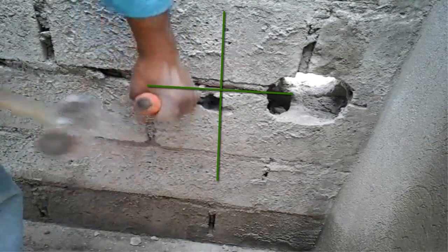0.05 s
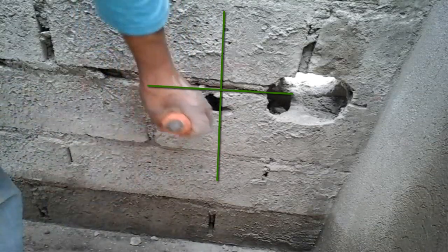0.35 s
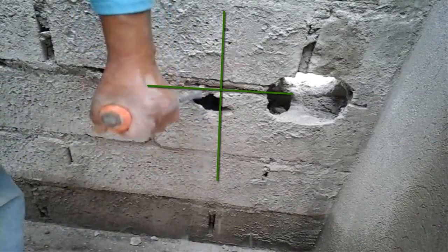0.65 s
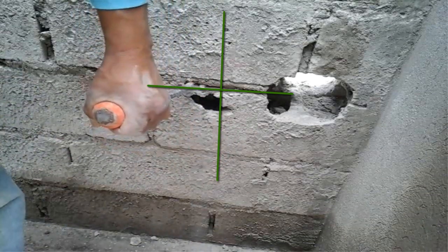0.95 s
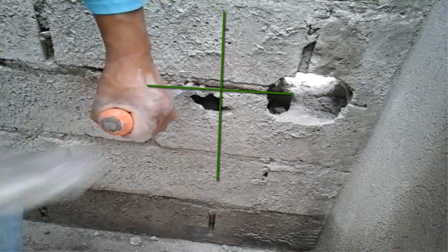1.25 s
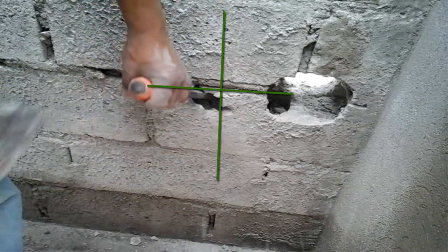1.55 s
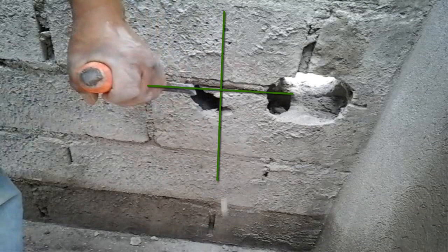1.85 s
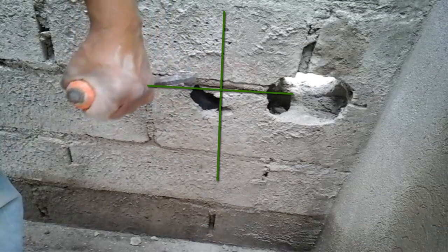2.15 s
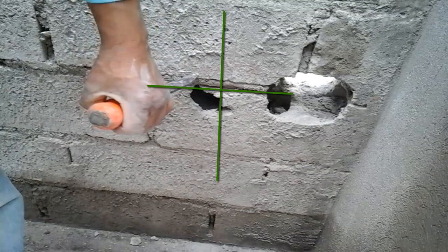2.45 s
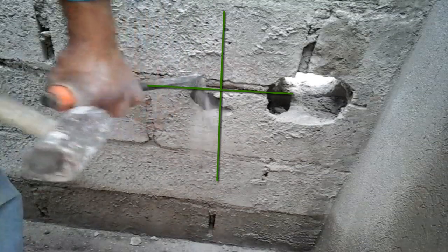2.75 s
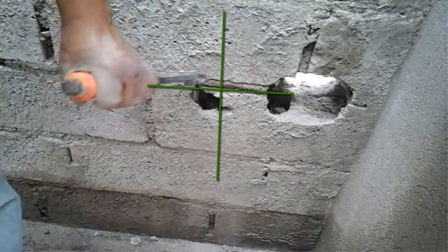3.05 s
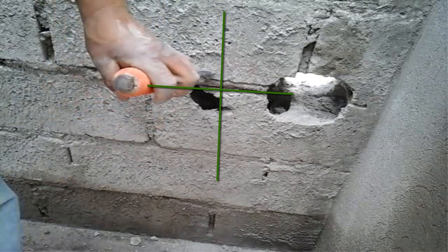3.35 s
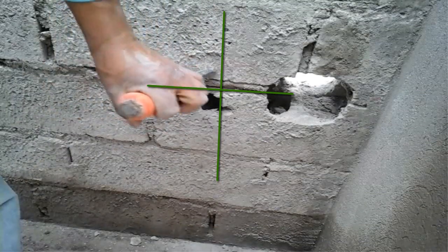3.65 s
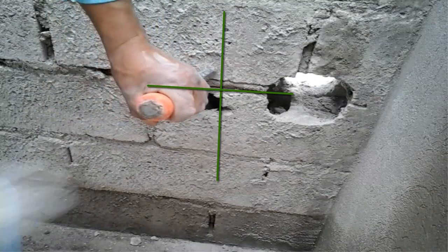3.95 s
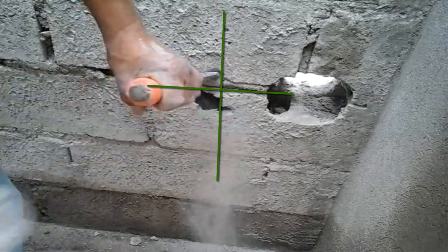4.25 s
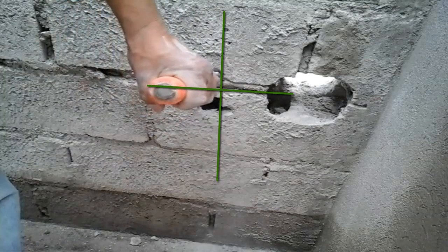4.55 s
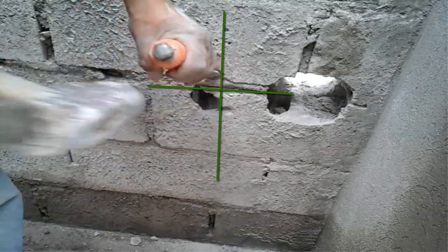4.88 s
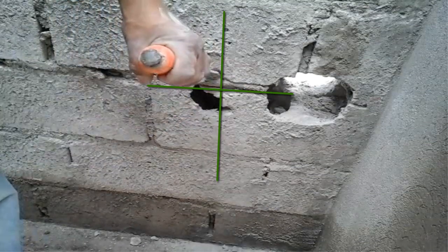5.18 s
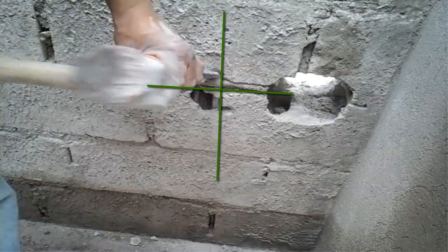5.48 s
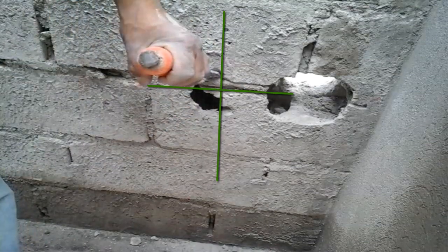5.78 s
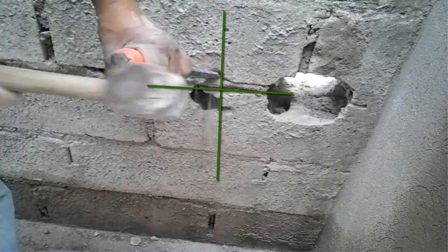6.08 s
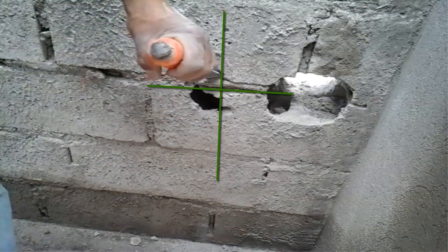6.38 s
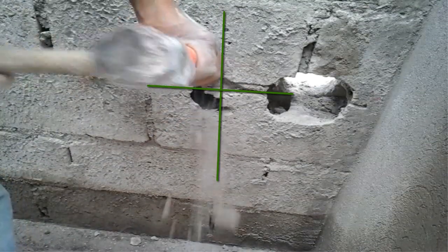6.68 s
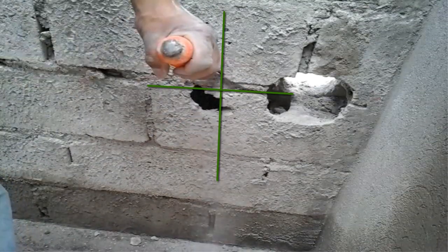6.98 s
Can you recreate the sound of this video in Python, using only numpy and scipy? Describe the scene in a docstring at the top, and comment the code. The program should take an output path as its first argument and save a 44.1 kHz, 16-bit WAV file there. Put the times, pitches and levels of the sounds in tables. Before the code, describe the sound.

A hammer drives a steel chisel into a hollow concrete block wall, close by and outdoors. The first blow, at 0.2 seconds, is a sharp, crumbling crack, followed at once by clacking chips and a lump knocking inside the wall, with more pieces around 0.7 seconds. A second crack at 1.6 seconds loosens more ticking chips, and a very faint whistle slides down just after 2 seconds. Firmer blows land at 3 and 4.4 seconds; another chip snaps off, and the loose chisel clinks at 4.6 seconds. Then comes a quicker, steady run at about 5, 5.7, 6.3 and 6.8 seconds, each hit meeting solid block with a crack, a low boom and a short ring. Faint sand and crumbs fall after the blows. The hits distort slightly and echo briefly off nearby hard surfaces, over a quiet distant rumble.

```python
"""A club hammer drives a steel chisel into a hollow concrete block wall, outdoors, at arm's length from
a stereo pair of microphones. The first blows break off chips and lumps that tick and fall; the later ones
meet solid block and make the wall boom. Sand trickles, the loose chisel clinks, a faint whistle slides
down once. Hard surfaces close by ring briefly over a distant rumble, and the blows overload the input."""
import sys
import numpy as np
from scipy import signal
from scipy.fft import rfft, irfft, next_fast_len
from scipy.io import wavfile
from scipy.ndimage import uniform_filter1d

SR = 44100
rng = np.random.default_rng(int(sys.argv[2]) if len(sys.argv) > 2 else 0)


def output_pcm(signal):
    """Save a mono or channel-first signal as 16-bit PCM at the path in sys.argv[1].

    Samples are clipped to [-1, 1] before scaling.
    """
    pcm = np.clip(np.atleast_2d(signal).T, -1, 1) * 32767
    wavfile.write(sys.argv[1], SR, np.round(pcm).astype(np.int16))


N = 309582
RING = 36000  # samples given to one event and its decay
AGE = np.arange(RING) / SR  # seconds since the event began

# hammer blows [t/s, level/dB, firmness from 0 (crumbling) to 1 (solid), hollow core level/dB]
BLOWS = [(.236, -3.5, .02, -32.5), (1.618, -1, 0, -33), (2.963, 2, 0.46, -11.5), (4.357, -1.5, 0.79, -8.5),
         (5.032, 2.5, 1, -22), (5.654, 3, 0.9, -14.5), (6.251, 2, 0.96, -14), (6.843, -1, 0.98, -11)]
# lumps landing inside the block [t/s, clack level/dB, knock level/dB]
LUMPS = [(.297, -10, -10), (0.658, -23.5, -32), (.739, -22.5, -33), (1.008, -35, -29), (2.354, -34, -26.5),
         (3.579, -43, -40)]
# low modes of the wall and the space before it [f/Hz, level/dB, t60/s]
WALL_MODES = [(106.7, -12.5, 0.84), (124, -13.5, 0.95), (131.7, -8.5, 0.15), (179.9, -5, .55),
              (190.8, -4, .48), (238.3, 0.5, .36), (279, -7, 0.43), (328.8, -3, 0.44), (395, -9.5, 0.27),
              (432.6, -9.5, 0.34)]
# likeness of diffuse sound at the two microphones [f/Hz, correlation]
MIC_CORRELATION = [(100, -0.86), (300, -0.74), (640, -0.36), (1400, 0), (4000, 0)]


def undb(db):
    """Decibels to gain."""
    return 10 ** (np.asarray(db) / 20)


def read(points, hz):
    """A table's value at hz, on a log-frequency axis."""
    f, value = np.transpose(points)
    return np.interp(np.log(np.maximum(hz, 1)), np.log(f), value)


def between(ends, share):
    """The value a share of the way from one end to the other."""
    return ends[0] + (ends[1] - ends[0]) * np.clip(share, 0, 1)


def freqs(size):
    """Spectrum frequencies for size samples, raised 1 Hz to keep logarithms finite."""
    return np.fft.rfftfreq(size, 1 / SR) + 1


def shape(x, gain):
    """Filter by a gain per frequency; white noise keeps its power."""
    return irfft(rfft(x) * gain / np.sqrt(np.mean(gain ** 2)), x.shape[-1])


def colour(x, points):
    """Filter by a curve [f/Hz, relative level/dB]."""
    return shape(x, undb(read(points, freqs(x.shape[-1]))))


def resonance(hz, width_octaves):
    """The gain per frequency of a broad resonance."""
    return np.exp(-.5 * (np.log2(freqs(RING) / hz) / width_octaves) ** 2)


def swell(seconds):
    """Heavy things take a moment to get moving."""
    return 1 - np.exp(-AGE / seconds)


def fade(t60):
    """A decay that loses 60 dB in t60 seconds."""
    return np.exp(-np.log(1000) * AGE / t60)


def settle(sound):
    """Bring the second half of an event to rest."""
    return sound * np.minimum(2 * (1 - AGE / AGE[-1]), 1) ** 2


def add(track, s, sound):
    """Mix a sound into a track at s seconds."""
    start = int(s * SR)
    part = sound[:, :max(N - start, 0)]
    track[:, start:start + part.shape[1]] += part


def diffuse(size):
    """Diffuse noise at both microphones; the bass arrives largely in opposite phase."""
    alike = np.clip(read(MIC_CORRELATION, freqs(size)), -.99, .99)
    mid, side = rfft(rng.standard_normal((2, size))) * np.sqrt([(1 + alike) / 2, (1 - alike) / 2])
    return irfft([mid + side, mid - side], size)


def reflections(early_t60, tail_db):
    """Hard surfaces close by: dense early reflections, then a tail in which the bass lasts longest."""
    # reverberation times [f/Hz, t60/s]
    tail_t60 = [(100, 0.99), (300, 0.67), (1000, 0.37), (3000, 0.23), (6000, 0.33), (14000, 0.081)]
    octaves = np.log2(np.clip(freqs(RING), 62.5, 16000) / 62.5)
    spectrum = rfft(diffuse(RING))
    tail = 0
    for k in range(9):
        band = irfft(spectrum * np.maximum(1 - abs(octaves - k), 0), RING)
        tail = tail + band * fade(read(tail_t60, 62.5 * 2 ** k))
    return diffuse(RING) * fade(early_t60) + undb(tail_db) * tail


def ring(modes, scatter_db, detune):
    """Struck modes; each strike weights and tunes them a little differently."""
    out, power = 0, 0
    for (hz, db, t60), (size, shift, phase) in zip(modes, rng.standard_normal((len(modes), 3))):
        mic_lag = np.arccos(np.clip(read(MIC_CORRELATION, hz), -1, 1))
        angle = 2 * np.pi * (hz * (1 + detune * shift) * AGE + phase)
        out = out + undb(db + scatter_db * size) * fade(t60) * np.sin([angle, angle + mic_lag])
        power += undb(db) ** 2 / 2
    return out / np.sqrt(power)


def fracture(seconds, response, contact, rough_db):
    """One sharp contact, then a run of tiny breaks that builds up the reflected sound."""
    seconds = max(seconds, 1 / SR)
    breaks = uniform_filter1d(rng.standard_normal(RING), size=24)
    uneven = undb(rough_db * breaks / breaks.std() * np.exp(-AGE / (4 * seconds)))
    return response * uneven * np.sqrt((contact + swell(seconds)) / (contact + 1))


def outdoors():
    """A quiet, steady distant rumble under the hiss of the microphones."""
    # outdoor background [f/Hz, relative level/dB]
    rumble_spectrum = [(15, -42), (25, -13.5), (79, -4.5), (142, -5), (224, -6), (394, -7.5), (515, -12),
                       (588, -8), (856, -15.5), (1420, -21.5), (1910, -27), (10300, -34.5), (15000, -35)]
    rumble = colour(diffuse(next_fast_len(N)), rumble_spectrum)[:, :N]
    hiss = colour(rng.standard_normal((2, N)), [(14000, 0.5), (15500, -17.5)])
    return undb(-53.5) * rumble + undb(-74.5) * hiss


def hammer():
    """Each blow crushes concrete at the tip; the firmer the block, the more it rings and shakes the wall."""
    # crack of the concrete and thud of the wall [f/Hz, relative level/dB]
    crack_spectrum = [(40, -14.5), (150, -7.5), (600, -10), (1000, -3.5), (1600, -0.5), (2600, 0),
                      (3500, -1), (5200, -2.5), (6300, -12), (10000, -14.5), (16000, -23)]
    thud_spectrum = [(25, -31.5), (70, -18.5), (120, -9), (220, 0.5), (350, -2.5), (500, -11), (700, -3.5),
                     (1100, -24), (3000, -53.5)]
    # modes of the block with the chisel pressed into it [f/Hz, level/dB, t60/s]
    block_modes = [(592, 3, .33), (651, 0, .3), (688, 3, .26), (803, -6, .24), (899, -4, .3),
                   (927, -3, .25), (1045, -2, .3), (1200, -8, .38), (1308, -2, .2), (1486, -6, .38),
                   (1640, -2, .25), (1702, 1, .2), (1787, -4, .2), (1940, -2, .22), (2218, -4, .35),
                   (2300, -1, .28), (2395, -3, .28), (2500, -2, .22), (2659, -11, .33)]
    # pairs run from crumbling to solid block
    crush_s, tilt_db_per_octave = (0.0012, 0.0031), (-0.54, -1.66)
    wall_db, block_db = (-22.5, -10), (-32, -15.5)
    treble_octaves = np.log2(np.maximum(freqs(RING) / 1000, 1))
    out = np.zeros((2, N))
    for s, db, firmness, core_db in BLOWS:
        response = reflections(early_t60=0.098, tail_db=-16.5)  # tip and hand shift between blows
        crush = fracture(between(crush_s, firmness), response, contact=0.57, rough_db=2.5)
        tilt_db = between(tilt_db_per_octave, firmness) * treble_octaves
        crack = shape(crush, undb(read(crack_spectrum, freqs(RING)) + tilt_db))
        thud = colour(reflections(early_t60=0.31, tail_db=-11.5), thud_spectrum)
        boom = ring(WALL_MODES, scatter_db=4.0, detune=0.0054)
        wall = (undb(-4) * thud + undb(-1.5) * boom) * swell(0.0047)
        core = shape(diffuse(RING) * fade(0.32) * swell(.006), resonance(hz=377, width_octaves=.75))
        block = ring(block_modes, scatter_db=3, detune=.002)
        blow = crack + undb(between(wall_db, firmness)) * wall + undb(between(block_db, firmness)) * block
        add(out, s, settle(undb(db) * blow + undb(core_db) * core))
    return out


def sand(delay_s=0.049, length_s=0.33, grains_per_s=1000, spread_db=3, surge_db=3):
    """Sand runs down the wall in surges after each blow and lump, most where the block crumbles."""
    # patter of fine grains [f/Hz, relative level/dB]
    sand_spectrum = [(300, -20.5), (1500, -6.5), (2900, 0.5), (4700, -2.5), (7000, -12), (15000, -14)]
    blow_db, lump_db = (-56, -66), -69
    shaken = [(s, between(blow_db, firmness)) for s, _, firmness, _ in BLOWS]
    shaken += [(s, lump_db) for s, *_ in LUMPS]
    out, response = np.zeros((2, N)), reflections(early_t60=.04, tail_db=-18)
    for s, db in shaken:
        falls = rng.random(RING) < grains_per_s / SR
        sizes = undb(spread_db * np.minimum(rng.exponential(size=RING), 5))
        grains = falls * sizes * rng.choice([-1, 1], RING)
        surges = np.interp(AGE, np.linspace(0, AGE[-1], 36), rng.standard_normal(36))
        flow = np.sqrt(np.sin(np.pi * np.minimum(AGE / length_s, 1))) * undb(surge_db * surges)
        trickle = grains * flow / grains.std()
        patter = signal.fftconvolve(response, trickle[None])[:, :RING] / np.linalg.norm(response[0])
        add(out, s + delay_s, undb(db) * settle(colour(patter, sand_spectrum)))
    return out


def clack(hz, crumble_s, skirt_db=-16, dull_hz=7000):
    """A stony piece snaps and clacks around a pitch set by its size."""
    # modes of a stony flake [f/Hz, level/dB, t60/s before added damping]
    flake_modes = [(1829, -2, 0.2), (2070, -8, 0.097), (2770, -1, 0.079), (2990, 0, 0.062),
                   (3470, -1, 0.07), (4070, -3, 0.26)]
    body = resonance(hz, width_octaves=0.59) + undb(skirt_db) / (1 + (freqs(RING) / dull_hz) ** 2)
    snap = fracture(crumble_s, reflections(early_t60=0.067, tail_db=-15), contact=0.16, rough_db=6.5)
    flake = ring(flake_modes, scatter_db=1.5, detune=0.045) * fade(t60=0.27)
    sound = shape(snap + undb(-14) * flake, body)
    return settle(sound / abs(sound.mean(axis=0)).max())


def chips(crumble_s=.006, doubling_db=22):
    """Chips crack off and tick against the blade; louder, larger ones crumble for longer."""
    # chips breaking loose [t/s, level/dB, centre f/Hz]
    breaks = [(0.2879, -9, 2580), (0.697, -23, 1950), (1.1836, -40, 1180), (1.2085, -43.5, 2930),
              (1.834, -34.5, 4730), (1.918, -24, 3800), (1.951, -19, 2600), (2.2826, -36.5, 2770),
              (3.4298, -43, 3220), (4.4037, -14.5, 3160), (4.6604, -28, 3600), (4.8594, -45, 4000)]
    out = np.zeros((2, N))
    for s, db, hz in breaks:
        add(out, s, undb(db) * clack(hz, crumble_s * 2 ** (db / doubling_db)))
    return out


def knock(hz):
    """A dull bump in the hollow block that faintly shakes the wall."""
    hollow = shape(reflections(early_t60=0.28, tail_db=-17.5), resonance(hz, width_octaves=.65))
    wall = ring(WALL_MODES, scatter_db=4.0, detune=0.0055)
    return settle((hollow + undb(-9.5) * wall) * swell(0.0059))


def lumps(clack_hz=2500, crumble_s=0.0026, bounce_s=0.017, bounce_db=-8.5):
    """A lump lands inside the block with a clack and a knock, then bounces once."""
    out = np.zeros((2, N))
    for s, clack_db, knock_db in LUMPS:
        add(out, s, undb(clack_db) * clack(clack_hz, crumble_s) + undb(knock_db) * knock(hz=270))
        add(out, s + bounce_s, undb(clack_db + bounce_db) * clack(clack_hz, crumble_s))
    return out


def crumbs(count=2, fall_s=(0.13, 0.68), db=-50.5, hz=3610, scatter_db=3, scatter_octaves=.4):
    """Stray crumbs of random size drop and tick faintly after each blow."""
    out = np.zeros((2, N))
    for s, *_ in BLOWS:
        for when, (loud, pitch) in zip(rng.random(count), rng.standard_normal((count, 2))):
            tick = clack(hz * 2 ** (scatter_octaves * pitch), crumble_s=.001)
            add(out, s + between(fall_s, when), undb(db + scatter_db * loud) * tick)
    return out


def whistle(start_s=2.034, length_s=0.32, slide_hz=(5650, 3300), waver=0.045, db=-58):
    """A faint, rough whistle that slides down, loudest near its end."""
    progress = np.minimum(AGE / length_s, 1)
    wobble = uniform_filter1d(rng.standard_normal((2, RING)), size=40)
    hz = between(slide_hz, progress) * (1 + waver * wobble / wobble.std())
    tone = np.sin(2 * np.pi * np.cumsum(hz, axis=1) / SR)
    out = np.zeros((2, N))
    add(out, start_s, undb(db) * np.sin(np.pi * progress ** 2) * tone)
    return out


def clinks(firm_touch_db=-21.5):
    """Free of the wall, the chisel rings when it is touched, and bumps the block."""
    # light touches on the chisel [t/s, level/dB]
    touches = [(3.197, -45), (3.268, -60), (4.609, -21)]
    # modes of the loosely held chisel [f/Hz, level/dB, t60/s]
    chisel_modes = [(2370, -4, .14), (2905, -6, .25), (2977, 1, .21), (4040, -1, .11), (4296, -12, .28),
                    (4600, -7, .27), (5480, 1, .18), (5830, -20, .3), (7461, -10, .18), (8400, -16, .18),
                    (9500, -15, .16)]
    # tick of the contact [f/Hz, relative level/dB]
    tick_spectrum = [(300, -4.5), (1200, -8), (4000, 0.0), (7000, -10.5), (15000, -15)]
    out, response = np.zeros((2, N)), reflections(early_t60=0.116, tail_db=-10.5)
    for s, touch_db in touches:
        db_per_octave = .55 * (touch_db - firm_touch_db)  # a soft touch spares the high modes
        modes = [(hz, db + db_per_octave * np.log2(hz / 1000), t60) for hz, db, t60 in chisel_modes]
        tick = colour(fracture(.0005, response, contact=0.8, rough_db=-7.5), tick_spectrum)
        steel = ring(modes, scatter_db=2, detune=.001)
        clink = steel + undb(-3) * tick + undb(-15.5) * knock(hz=170)
        add(out, s, undb(touch_db) * settle(clink))
    return out


def scene():
    """The work at the wall is fuller in the left microphone and brighter in the right."""
    # balance of sound from the wall [f/Hz, left minus right level/dB]
    balance = [(60, 5), (200, 4.5), (700, 2.5), (1300, -2.5), (2400, -4), (4000, -14), (8000, -7),
               (15000, -2.5)]
    work = hammer() + chips() + lumps() + clinks() + sand() + crumbs() + whistle()
    size = next_fast_len(N + RING)
    mic_gains = undb(np.outer([.5, -.5], read(balance, freqs(size))))
    mic_gains /= np.sqrt(np.mean(mic_gains ** 2, axis=0))
    return irfft(rfft(work, size) * mic_gains, size)[:, :N] + outdoors()


def record(dry, ceiling=0.73, hardness=5, top_hz=16000):
    """The input stage flattens the peaks of the blows; the highest treble is cut off."""
    clipped = dry / (1 + abs(dry / ceiling) ** hardness) ** (1 / hardness)
    return signal.sosfilt(signal.ellip(10, .1, 70, top_hz, fs=SR, output="sos"), clipped)


dry = scene()
out = record(dry)
output_pcm(out)
```